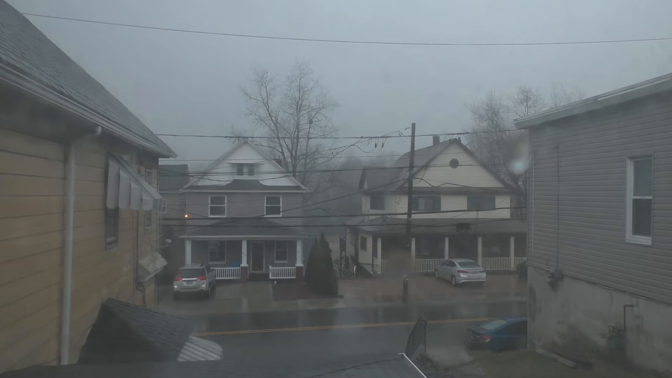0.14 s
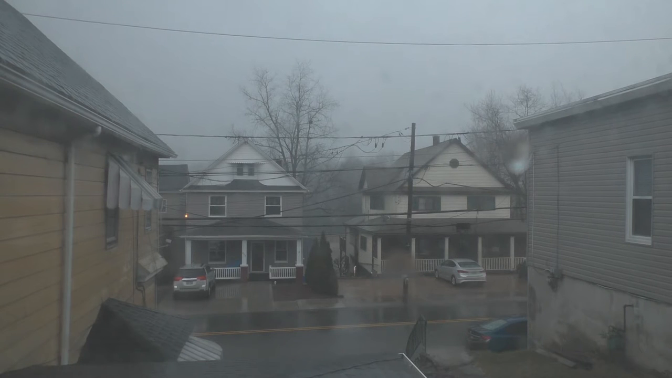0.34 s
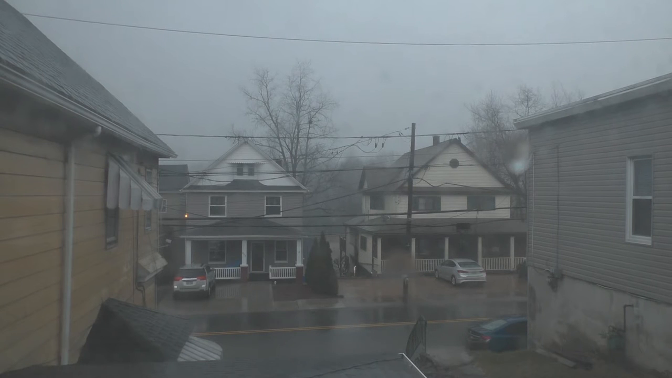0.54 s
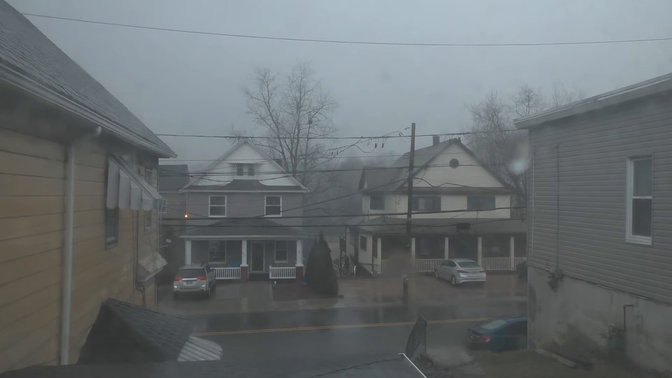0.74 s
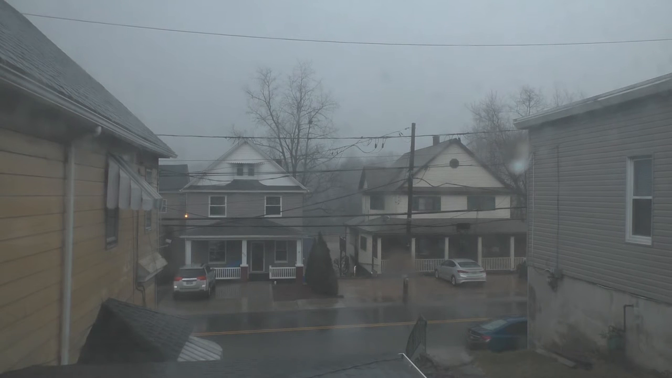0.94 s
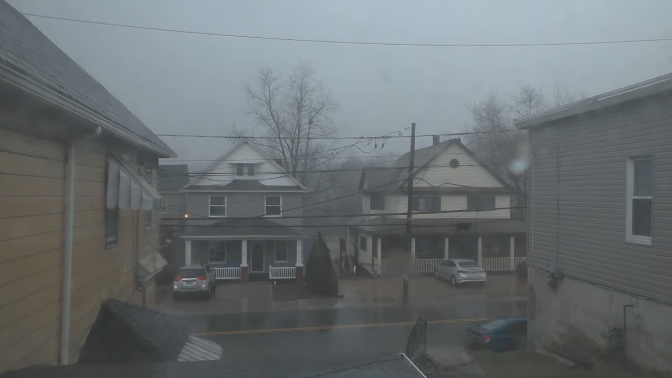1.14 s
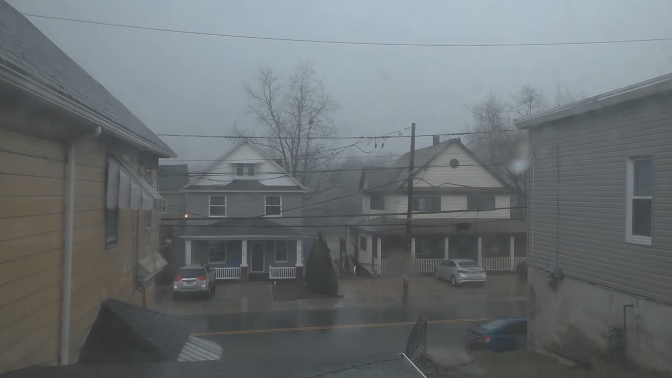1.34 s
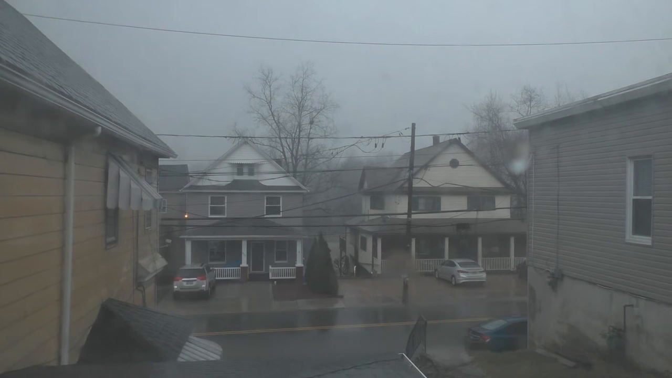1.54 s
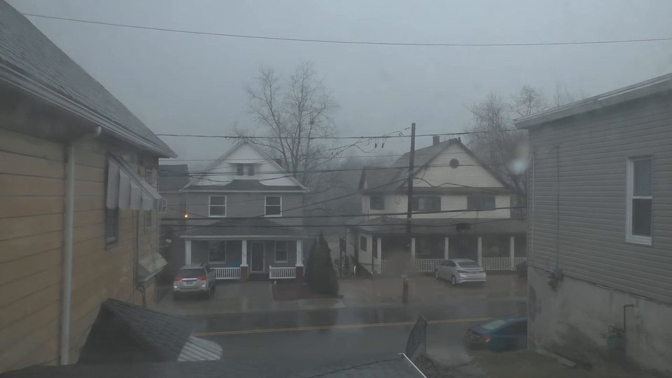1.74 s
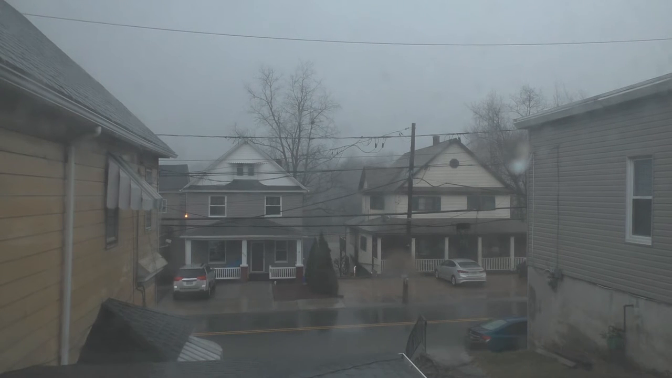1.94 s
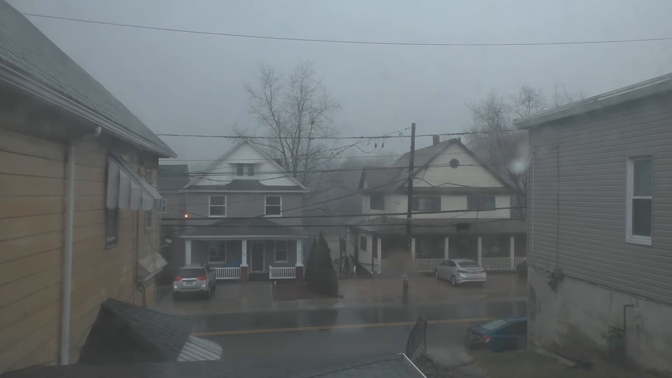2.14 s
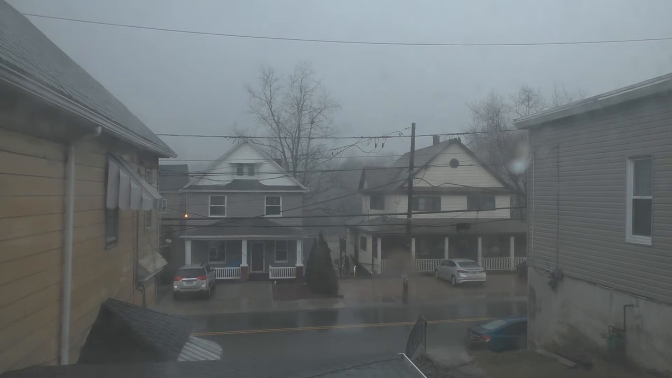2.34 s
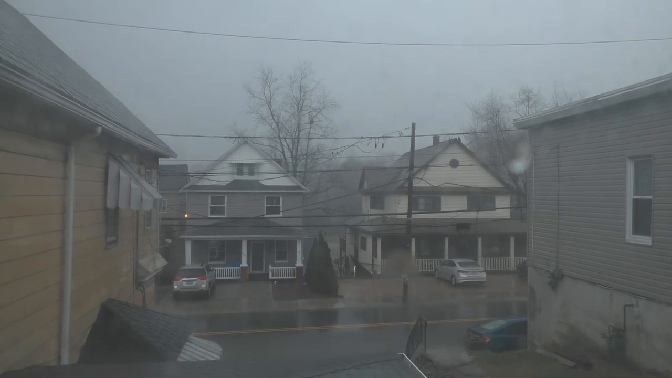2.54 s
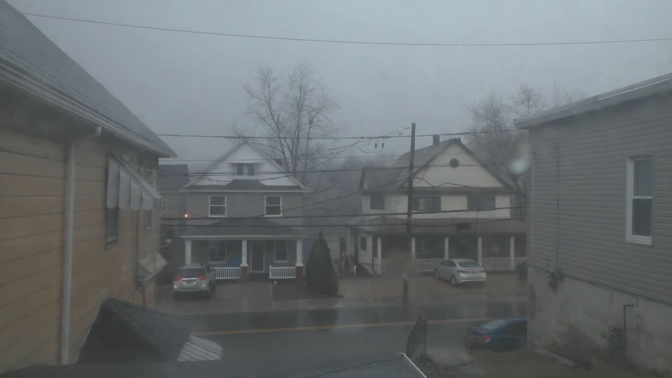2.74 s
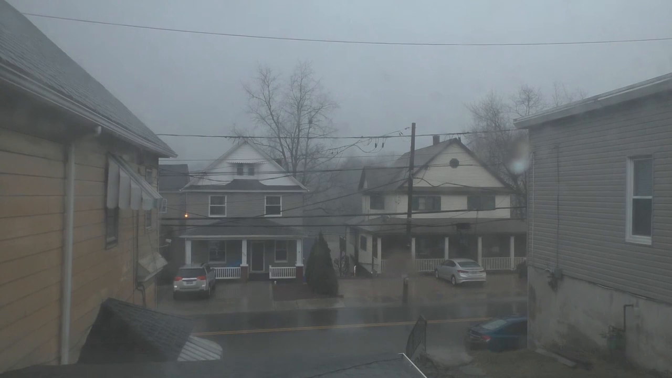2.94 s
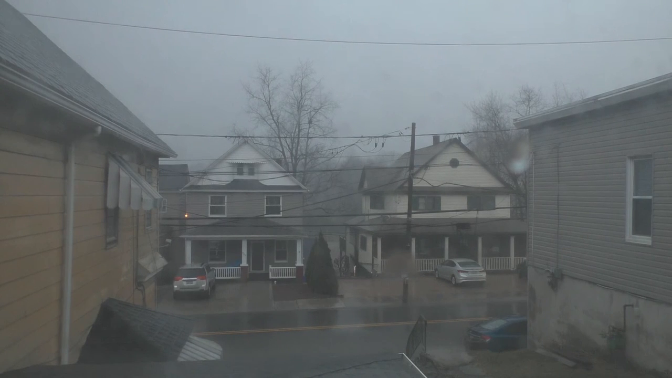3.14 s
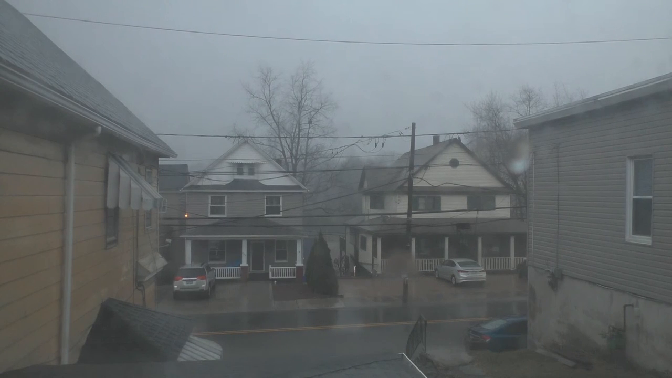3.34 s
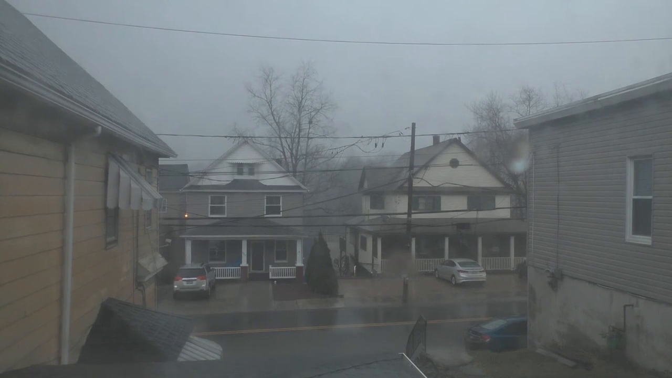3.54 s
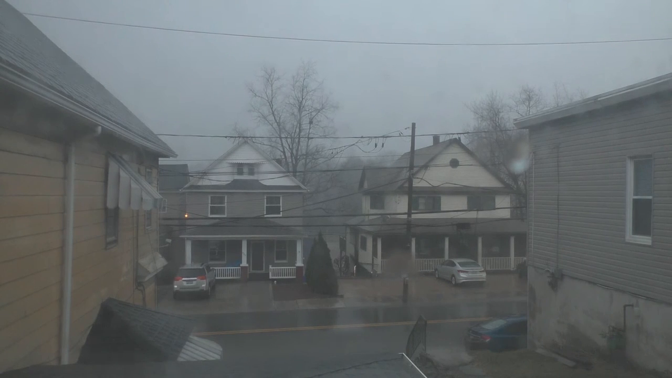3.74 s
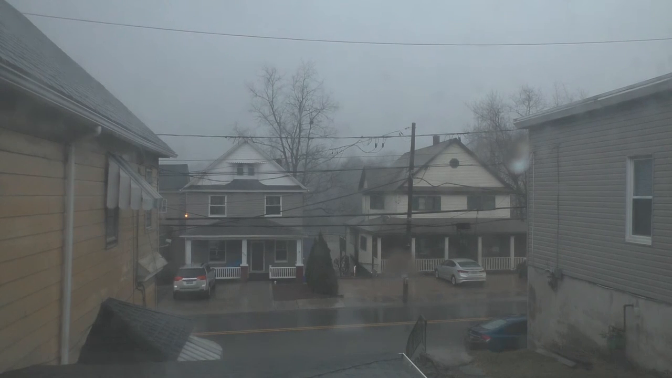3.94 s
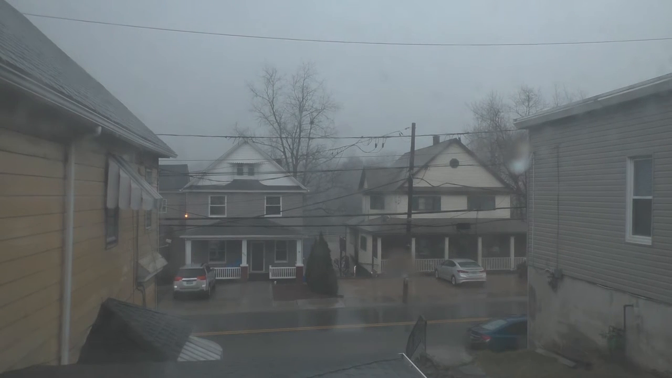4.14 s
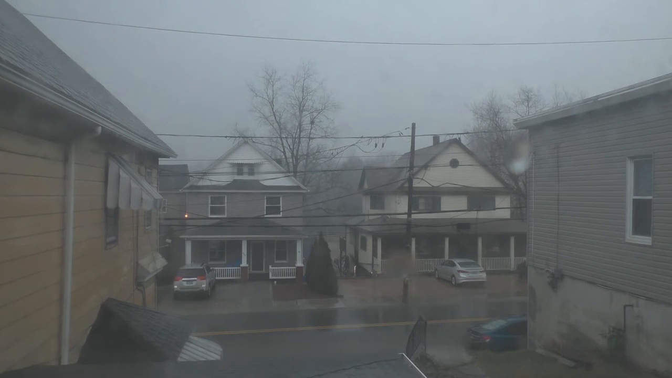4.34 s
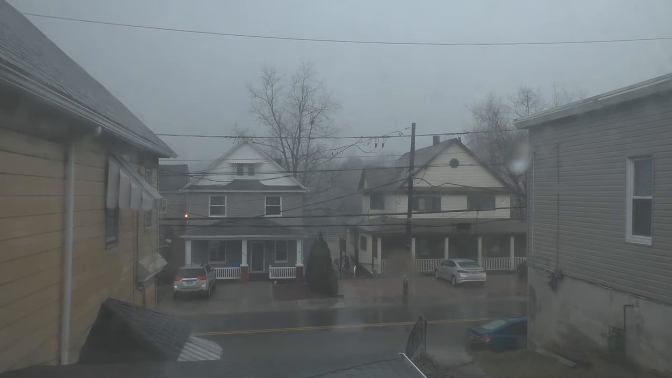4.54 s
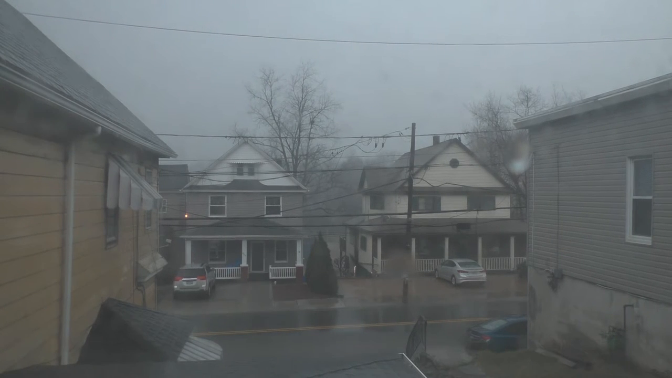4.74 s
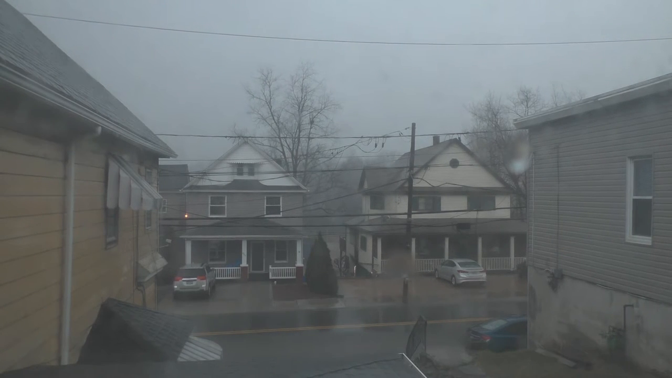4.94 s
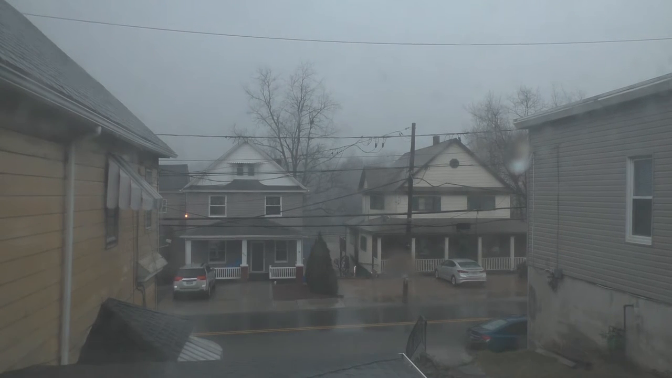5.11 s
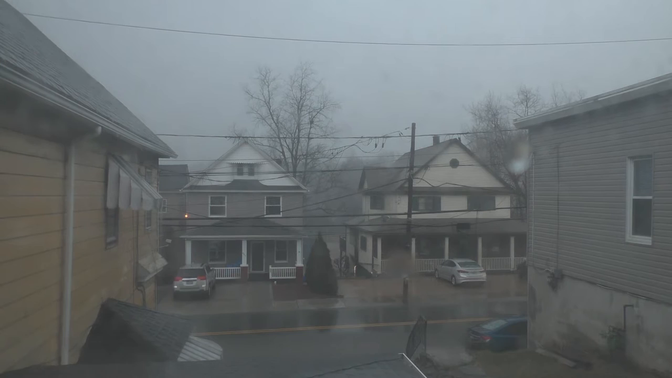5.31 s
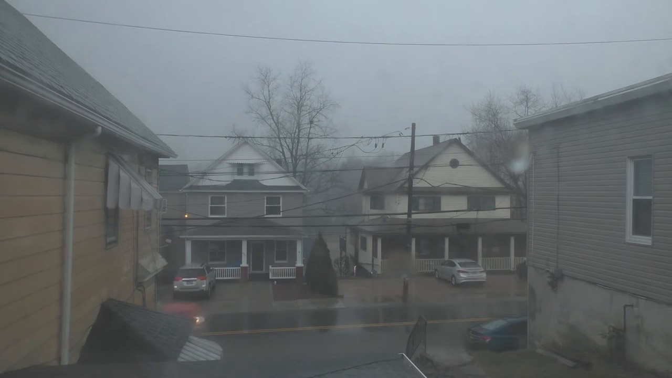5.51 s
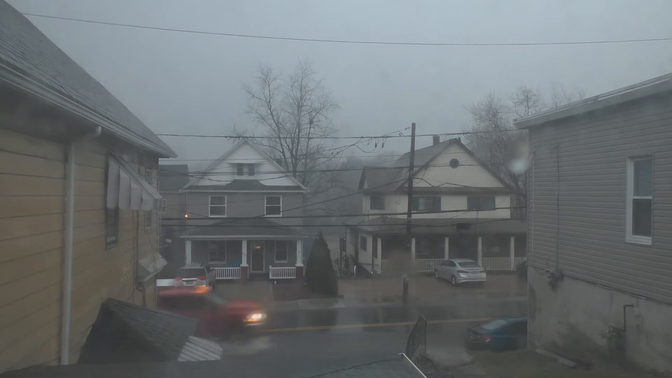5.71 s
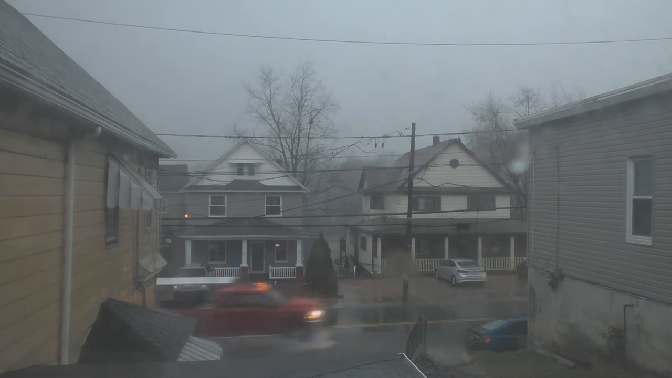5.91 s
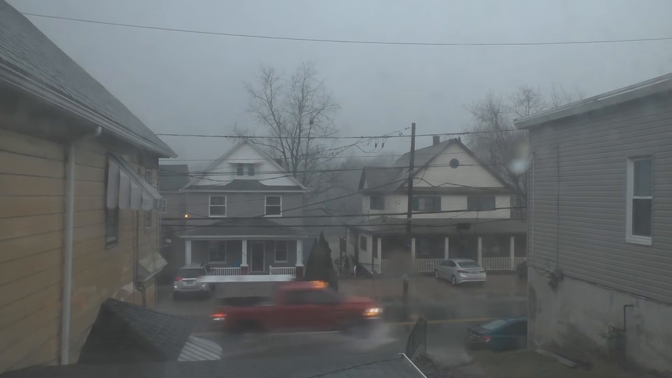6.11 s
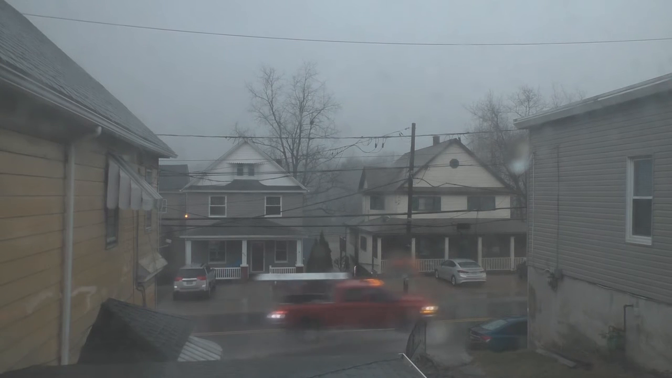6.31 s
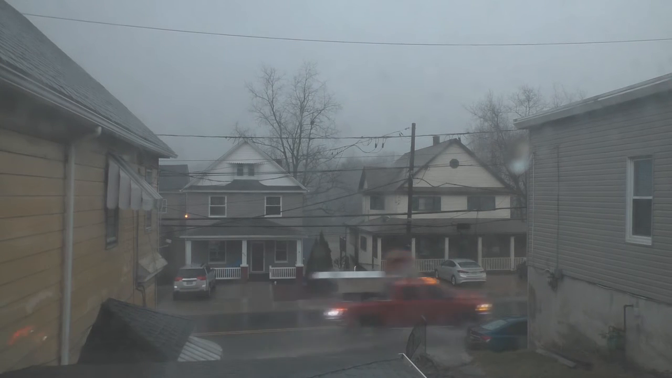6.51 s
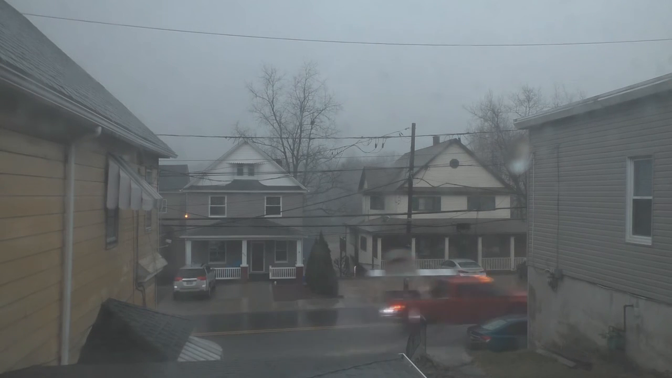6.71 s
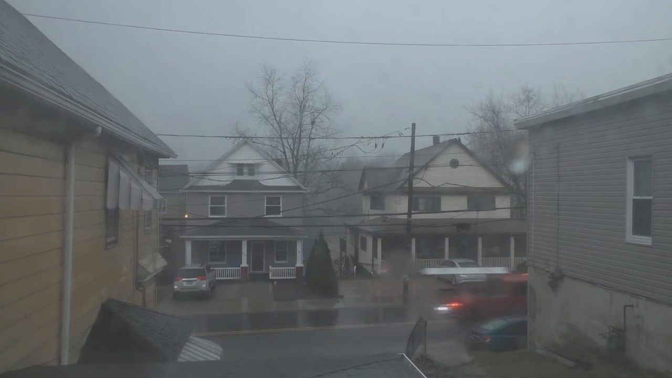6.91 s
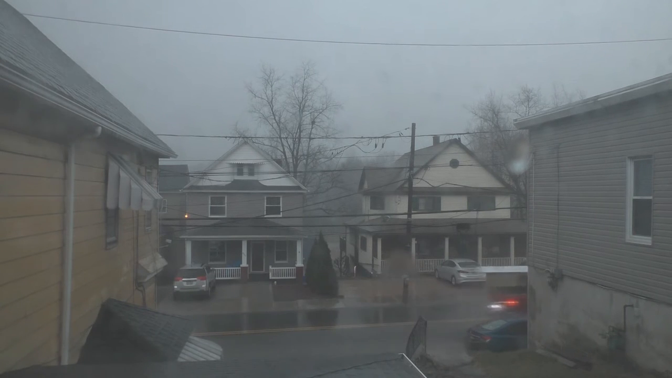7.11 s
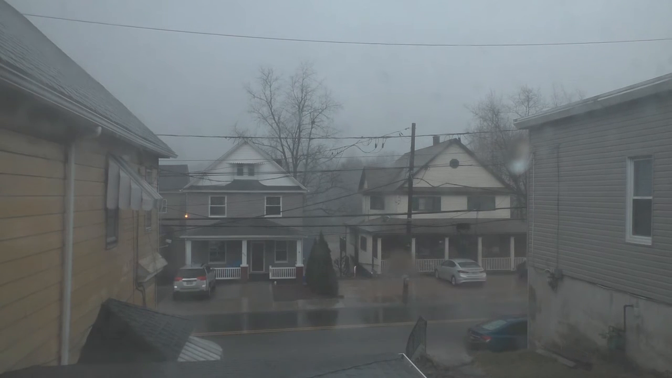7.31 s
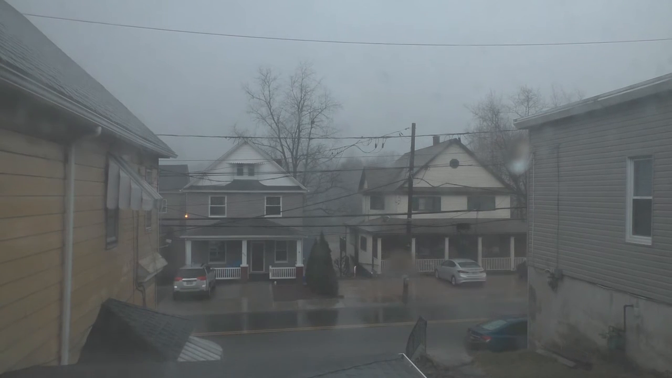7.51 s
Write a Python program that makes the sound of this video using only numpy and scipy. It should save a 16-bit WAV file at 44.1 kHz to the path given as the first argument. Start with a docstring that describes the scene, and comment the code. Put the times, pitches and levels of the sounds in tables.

```python
"""Pickup passing on a wet street

A six-cylinder pickup approaches behind a house, crosses the gap between two houses and drives on.
Its exhaust drones in orders of the engine cycle over puffing noise; tyres hiss and throw spray as shaped noise.
A ladder rack rattles as knocked resonances, and a narrow whine and a wavering hum come and go.
Rain washes over the street as noise, and single drops tick near the window as short noise bands."""
import sys
import numpy as np
from scipy import signal
from scipy.io import wavfile
from scipy.ndimage import uniform_filter1d

SR = 44100
rng = np.random.default_rng(int(sys.argv[2]) if len(sys.argv) > 2 else 0)


def ratio(d):
    """dB to gain"""
    e = np.asarray(d, float) / 20
    return 10 ** e


def wav_record(signal):
    """Record a signal, one row per channel, as 16-bit PCM in the file named by sys.argv[1]."""
    frames = np.transpose(np.atleast_2d(signal))
    bounded = np.clip(frames, -1, 1)
    # unit amplitude maps onto the largest positive 16-bit level
    quanta = np.round(bounded * 32767).astype(np.int16)
    wavfile.write(sys.argv[1], SR, quanta)


N = 333396
T = np.arange(N) / SR


def evened(x):
    """Scales to rms 1."""
    return x / np.sqrt(np.mean(x ** 2) + 1e-20)


def read(points, hz):
    """Reads a spectrum on a log-frequency axis."""
    f, value = np.transpose(points)
    return np.interp(np.log(hz + 1), np.log(f + 1), value)


def columns(rows, t):
    """Joins curve rows by straight lines."""
    s, *values = np.transpose(rows)
    return [np.interp(t, s, v) for v in values]


def wander(t, rate, count):
    """Slow random curves of rms 1, changing about rate times a second."""
    knots = rng.standard_normal((count, 400))
    return np.array([evened(np.interp(t * rate, np.arange(len(k)), k)) for k in knots])


def resonate(x, hz, width):
    """Shifts hz down to zero, smooths twice, and shifts back: a steep resonance of gain 1."""
    turn = np.exp(2j * np.pi * np.cumsum(hz * np.ones(len(x))) / SR)
    r = np.exp(-np.pi * width / SR)
    smoothed = signal.lfilter([(1 - r) ** 2], [1, -2 * r, r * r], x / turn)
    return 2 * (turn * smoothed).real


def noise(spectrum, patchy_db, flicker_db, patch_hz, patch_s, size=1024):
    """Diffuse stereo noise of rms 1: random short-time spectra with patches and a flicker shared by wide bands."""
    # left-right likeness: f/Hz, correlation
    likeness = [(60, 0.34), (120, 1), (240, 0.62), (480, 0.77), (950, 0.032), (1890, 0.12), (3770, 0.11),
                (7520, 1), (11000, 0.33), (15000, .35)]
    hop, hz = size // 4, np.fft.rfftfreq(size, 1 / SR)
    a, b, c, d, patches, flicker = rng.standard_normal((N // hop + 5, len(hz), 6), dtype=np.float32).T

    patch_bins, patch_frames = max(round(patch_hz * size / SR), 1), max(round(patch_s * SR / hop), 1)
    patches = uniform_filter1d(patches, size=patch_bins, axis=0)
    patches = evened(uniform_filter1d(patches, size=patch_frames, axis=1))
    flicker = uniform_filter1d(flicker, size=size // 8, axis=0)
    flicker = evened(uniform_filter1d(flicker, size=3, axis=1))

    same = np.clip(read(likeness, hz), 0, 1)[:, None]
    mid, side = np.sqrt(1 + same) * (a + 1j * b), np.sqrt(1 - same) * (c + 1j * d)
    level_db = read(spectrum, hz)[:, None] + patchy_db * patches + flicker_db * flicker
    z = np.array([mid + side, mid - side]) * ratio(level_db)
    return evened(signal.istft(z, nperseg=size, noverlap=size - hop)[1][:, :N])


def splash(hz, spread, t60):
    """One drop: a short decaying band of noise with a soft start, peak 1."""
    u = np.arange(2000) / SR
    edges_hz = [hz / spread, min(hz * spread, .45 * SR)]
    band = signal.butter(2, edges_hz, "band", fs=SR, output="sos")
    drop = signal.sosfilt(band, rng.standard_normal(len(u)))
    drop = drop * ratio(-60 * u / t60) * np.minimum(u / .006, 1)
    return drop / abs(drop).max()


def rain():
    """A wash of noise, a patter of small random drops, and the large drops that splash close by."""
    # wash on the street: f/Hz, relative density/dB per Hz
    wash = [(12, -56), (20, -26), (38, -35), (58, -9), (81, -8), (171, 2), (239, -11), (582, -20.5),
            (835, -36.5), (1460, -19.5), (1720, -25.5), (4090, -28), (15600, -44.5)]
    # large drops: t/s, peak/dB, f/Hz, L-R/dB
    large = [(0.3027, -42, 5000, 0), (.93, -50, 8000, 0), (1.459, -45.5, 7500, 0), (2.1026, -46, 3800, .5),
             (2.262, -47, 7000, 0), (2.372, -40, 4600, 1), (2.41, -50, 5200, 1), (2.4894, -47, 6500, -1.5),
             (2.8813, -37.5, 4840, -.6), (2.9294, -43, 4530, -.6), (3.0135, -46, 4200, .5),
             (3.1294, -45, 7000, -1.2), (3.408, -42, 5350, 1.5), (3.6027, -49, 4200, 1),
             (3.8795, -42, 5000, -.6), (4.2587, -41, 4500, 1), (4.9901, -40.5, 6400, 5),
             (5.2794, -42, 5420, -.5), (7.2994, -47, 8000, -.6)]
    wash_db = -41.5
    out = ratio(wash_db) * noise(wash, 2.15, 1.0, 120, .06)

    patter = []
    for when, size, pitch, pan in rng.random((400, 4)):
        peak_db = -60 - 7 * pitch - 3 * np.log(size + .03)  # few loud, many faint
        patter.append((when * N / SR, peak_db, 3000 * 4 ** pitch, 6 * (pan - .5)))

    for s, db, hz, pan_db in patter + [tuple(drop) for drop in large]:
        part = out[:, round(s * SR):][:, :2000]
        gain = ratio(db + pan_db * np.array([[.5], [-.5]]))
        part += gain * splash(hz, 1.32, 0.1)[:part.shape[1]]
    return out


def hum():
    """A sine of wavering pitch plus resonant noise; it rises quickly, then fades as the truck leaves."""
    start_s, rise_s, level_db, fade_db_per_s = 7.21, .12, -42, -10
    centre_hz, waver_hz, fuzz_share, fuzz_width_hz = 649, 4, .8, 45
    first = 7 * SR
    u = np.maximum(T[first:] - start_s, 0)
    hz = centre_hz + waver_hz * wander(u, 10.1, count=1)[0]
    tone = np.sqrt(2) * np.cos(2 * np.pi * np.cumsum(hz) / SR)
    fuzz = fuzz_share * evened(resonate(rng.standard_normal(len(u)), hz, fuzz_width_hz))
    gain = np.minimum(u / rise_s, 1) * ratio(level_db + fade_db_per_s * u)
    return np.pad(gain * (tone + fuzz), (first, 0))


def whine():
    """A narrow band of noise, gliding mostly upward, leads the tyre hiss as the truck nears the gap."""
    # glide: t/s, f/Hz, level/dB
    glide = [(5.36, 1440, -66), (5.44, 1445, -48.5), (5.5, 1410, -53), (5.56, 1440, -50), (5.59, 1514, -43),
             (5.66, 1544, -50), (5.75, 1490, -64)]
    width_hz = 45
    first, last = round(glide[0][0] * SR), round(glide[-1][0] * SR)
    hz, db = columns(glide, T[first:last])
    tone = evened(resonate(rng.standard_normal(last - first), hz, width_hz))
    return np.pad(ratio(db) * tone, (first, N - last))


def rack():
    """Bumps knock the ladder rack, whose modes ring briefly, over narrow bands of noise that flare."""
    # blows: t/s, nominal peak/dB, second and third modes against first/dB
    knocks = [(6.412, -30, -2), (6.429, -27, -6), (6.44, -31, 1), (6.452, -34, -2), (6.465, -33, -6),
              (6.501, -27, -6), (6.556, -30, -8), (6.568, -28, -8), (6.58, -26, -8), (6.615, -35, -7),
              (6.645, -33, 4), (6.707, -24, 3), (6.716, -27, 4), (6.733, -32, 5), (6.781, -22.5, 4),
              (6.848, -27, 2), (6.86, -36, 4), (6.92, -35, 0)]
    # modes: f/Hz, level/dB, ring time/s (down 60 dB after about 0.8 of it)
    modes = [(1656, -2, 0.041), (1910, -5, 0.028), (1440, -17, 0.047)]
    # flares as the truck passes: t/s, level/dB, time to 1/e each side/s, f/Hz
    flares = [(5.47, -48, 0.045, 5070), (5.9, -50, 0.17, 3420), (5.902, -47, 0.13, 2580),
              (6.463, -48.5, .047, 3700), (6.497, -46, 0.25, 1600), (6.606, -45, 0.026, 4000),
              (6.693, -43, 0.044, 4070), (6.75, -53.5, 0.31, 3730), (6.734, -44, 0.019, 3770),
              (6.948, -47.5, 0.26, 1750), (6.973, -46, 0.03, 3720), (7.028, -48, .05, 4050),
              (7.0, -48, .04, 2700), (7.11, -54, 0.053, 3970)]
    flare_width = 0.13  # share of the centre frequency
    first = 5 * SR
    t = T[first:]

    blows = np.zeros((2, len(t)))
    for s, db, other_db in knocks:
        blows[:, round(s * SR) - first] = ratio(db), ratio(db + other_db)
    blows = uniform_filter1d(uniform_filter1d(blows, size=11), size=11) * 1.01  # a padded blow

    out = 0
    for j, (hz, db, ring_s) in enumerate(modes):
        mode = resonate(blows[min(j, 1)], hz, 4.0 / ring_s)
        out = out + ratio(db) * mode * SR * ring_s * np.e / (7 * np.pi)  # peak near the blow's height

    white = rng.standard_normal(len(t))
    for s, db, long, hz in flares:
        flare = evened(resonate(white, hz, flare_width * hz))
        out += ratio(db) * np.exp(-((t - s) / long) ** 2) * flare
    return np.pad(out, (first, 0)) * ratio(np.array([[.6], [-.6]]))


def tyres():
    """Roar of the tread, streaked by echoes between the walls, and the finer spray thrown behind it."""
    # t/s, roar level/dB, spray level/dB
    levels = [(0, -48.5, -58), (.86, -50, -57), (1.22, -47.5, -52.5), (2.44, -44, -49.5), (2.9, -44.5, -51),
              (4.97, -45.5, -50), (5.25, -44, -46), (5.39, -43.5, -43.5), (5.52, -39, -41.5),
              (5.75, -34, -42), (5.95, -33.5, -41.5), (6.04, -34.5, -41.5), (6.17, -37.5, -44.5),
              (6.4, -35, -43), (6.8, -35.5, -46.5), (7.1, -34.5, -47.5), (7.3, -36, -44.5),
              (7.56, -38, -45.5)]
    # tread roar: f/Hz, relative density/dB per Hz
    roar = [(240, -20.5), (400, 0), (456, -7), (654, -8.5), (882, -13.5), (1160, -10.5), (1680, -10),
            (1990, -12), (2560, -12.5), (3140, -20.5), (3410, -15), (4080, -17.5), (5130, -26.5),
            (7000, -35.5), (9100, -82), (15400, -120)]
    # spray: f/Hz, relative density/dB per Hz
    spray = [(1760, -0.5), (3000, -1), (3420, -2), (4410, -7), (4990, -0.5), (5600, -3), (6670, -11),
             (14400, -23), (15600, -33)]
    roar_db, spray_db = columns(levels, T)
    out = ratio(roar_db) * noise(roar, 1.66, 0.3, 70, .07, size=2048)
    return out + ratio(spray_db) * noise(spray, 1.9, 1.45, 150, 0.058)


def engine():
    """Orders of the engine cycle as wavering sines, with turbulence puffing at the firing rate."""
    # slow rise behind the house, step up in the gap: t/s, level/dB
    loudness = [(0, -47), (1.75, -47), (2.25, -42), (3.25, -42.5), (3.5, -41), (3.75, -42.5), (4.0, -38),
                (4.5, -39), (4.8, -42), (5.3, -42), (5.65, -36.5), (5.88, -32), (5.96, -29), (6.15, -27),
                (6.3, -26), (6.75, -26), (6.95, -28), (7.56, -27.5)]
    # pitch sinks as the truck lifts off and passes: t/s, engine cycle rate/Hz
    speed = [(0, 15.5), (2.2, 15.55), (3, 15.4), (3.5, 15.47), (3.9, 15.78), (4.55, 16.05), (4.7, 15.9),
             (4.9, 15.42), (5.2, 15.02), (5.6, 14.66), (6, 14.5), (6.4, 14.36), (6.8, 14.32), (7.56, 14.67)]
    # orders against the engine level, 6 is the firing tone: multiple, far level/dB, near level/dB
    partials = [(6, -6.5, -9), (7, -7.5, -21), (8, -11, -13.5), (9, -9.5, -2.5), (10, 0.5, -8.5),
                (11, -9.5, -5), (12, -2, -3.5), (13, -4, -3), (14, -20, -12.5), (15, -17, -14),
                (17, -12.5, -15.5), (18, -11.5, -19.5), (19, -15, -13), (20, -16.5, -16.5), (21, -19, -14),
                (22, -19.5, -18.5), (23, -19.5, -25.5), (27, -23.5, -19), (29, -28.5, -27),
                (30, -29.5, -32.5), (35, -26.5, -28.5), (41, -29, -27)]
    # one order swells or dips, perhaps as wall echoes line up: t/s, multiple, change/dB, time to 1/e each side/s
    swells = [(1.21, 6, 14, 1), (1.8, 9, 2, 0.36), (2.22, 6, -14, 0.29), (2.247, 13, 9.5, 0.14),
              (3.1, 10, 5, 0.3), (2.996, 9, 16.5, 0.082), (3.22, 12, 5.5, 0.14), (3.33, 13, 7, 0.36),
              (3.32, 6, 7, 0.21), (3.57, 9, 18, 0.28), (4.1, 10, 5, 0.26), (4.22, 6, 13, 0.91),
              (4.05, 9, 13, 0.19), (4.33, 10, -18, .07), (3.26, 10, -12, .07), (4.32, 15, 13, 0.73),
              (4.995, 9, 15, 0.72), (5.2, 11, 14, 0.26), (5.33, 12, 13.5, 0.26), (5.652, 9, 12, 0.21),
              (5.84, 6, -14, 0.036), (4.8, 9, -16, .05), (6.07, 12, 12, 0.12), (5.2, 12, -20, 0.045),
              (6.24, 12, -16, 0.053), (7.1, 12, -12, .13), (6.093, 13, -20, 0.2), (6.13, 15, 20, 0.18),
              (7.4, 15, -15, 0.21), (6.26, 9, 7.5, 0.11), (5.5, 9, -16, 0.037), (6.6, 11, 5, 0.082),
              (5.7, 11, -20, 0.047), (6.495, 21, 9.5, 0.13), (6.597, 17, 6, 0.054), (6.79, 29, 15, 0.083),
              (7.05, 30, 11, 0.14), (5.76, 27, -9, 0.37), (7.42, 12, -8, .12), (6.3, 6, -5.5, .06),
              (2.25, 18, 9.5, 0.11), (2.91, 18, 11, 0.18), (4.0, 18, 8.5, 0.14), (4.6, 6, -1, .15),
              (3.47, 6, 5, 0.11), (6.65, 6, -14, 0.04), (1.602, 13, -14, 0.25), (1.05, 13, 8, 0.13),
              (4.2, 13, -9, 0.13), (6.374, 6, 13, 0.22), (6.49, 22, 15, 0.14), (6.602, 19, 7.5, 0.11),
              (6.847, 17, 11, 0.32), (6.89, 14, 11.5, 0.33), (7.07, 21, 9, 0.12), (7.4, 21, -18, .15),
              (7.286, 6, 10.5, 0.18), (7.3, 13, -8, 0.091), (6.73, 13, 4.5, 0.039), (6.43, 12, -8, .1),
              (6.74, 9, -3.5, .25), (7.44, 19, 8, 0.38)]
    # exhaust turbulence: f/Hz, relative density/dB per Hz
    turbulence = [(35, -52), (60, -12), (123, -7), (167, 8.5), (232, 0), (287, -1), (471, -17.5),
                  (582, -12), (1000, -35), (1300, -66), (2200, -120)]
    puff_far_db, puff_near_db = -4, -5  # against the engine level
    emerge_s, emerge_length_s = 5.37, 0.86  # truck clears the house: far colour turns to near
    echo_per_order, echo_most, echo_rate_hz = .055, .65, 8  # echo share grows with the order

    step = 28  # slow curves and orders run at SR / step
    t = np.arange(N // step + 40) * step / SR
    level_db = columns(loudness, t)[0]
    turns = 2 * np.pi * np.cumsum(columns(speed, t)[0]) * step / SR
    near = np.clip((t - emerge_s) / emerge_length_s, 0, 1)
    count = len(partials)
    start = 2 * np.pi * rng.random(count)
    drift, slip, apart = [wander(t, rate, count=count) for rate in (echo_rate_hz, echo_rate_hz, 4.7)]

    tone = 0
    for j, (k, far_db, near_db) in enumerate(partials):
        k = round(k)
        swell_db = sum(db * np.exp(-((t - s) / long) ** 2) for s, m, db, long in swells if round(m) == k)
        db = level_db + far_db + near * (near_db - far_db)
        echo_share = min(echo_per_order * k, echo_most) * ratio(np.minimum(swell_db, 0))
        # direct sound and shifting echoes beat against each other
        path = ratio(swell_db) + echo_share * (drift[j] + 1j * slip[j])
        angle = k * turns + start[j] + np.angle(path) + .025 * k * slip[j - 1]
        spread = 0.0098 * k * apart[j] * np.array([[1], [-1]])  # left-right phase, rad
        tone = tone + ratio(db) * abs(path) * np.cos(angle + spread)
    tone = signal.resample_poly(np.sqrt(2) * tone, step, 1, axis=1, padtype="antireflect")[:, :N]

    puff_db = level_db + puff_far_db + near * (puff_near_db - puff_far_db)
    gate = np.interp(T, t, ratio(puff_db) * (1 + .3 * np.cos(6 * turns)))
    puffs = gate * noise(turbulence, 3.5, 0.94, 30, 0.14, size=4096)
    return tone * ratio(np.array([[.3], [-.3]])) + puffs


def scene():
    """Everything at the window."""
    return rain() + hum() + whine() + rack() + tyres() + engine()


def roll_off(x):
    """The treble ends steeply here."""
    return signal.sosfilt(signal.butter(12, 15710, fs=SR, output="sos"), x)


def record(dry):
    """Passes on the finished mix at its own level."""
    return roll_off(dry)


dry = scene()
out = record(dry)
wav_record(out)
```